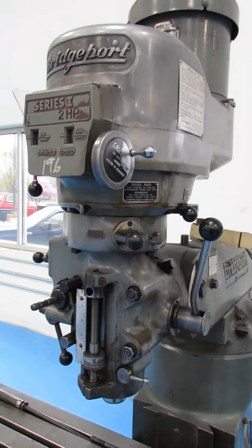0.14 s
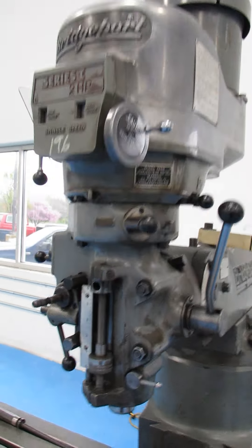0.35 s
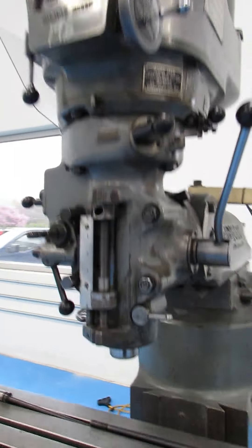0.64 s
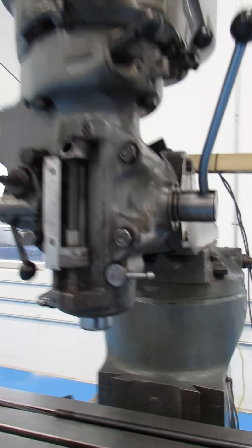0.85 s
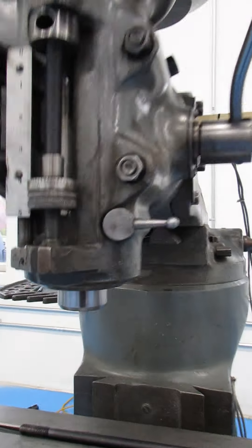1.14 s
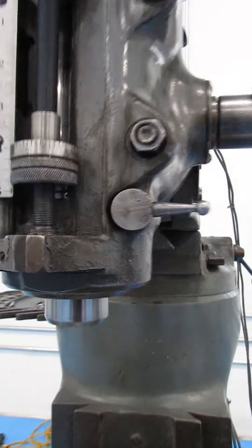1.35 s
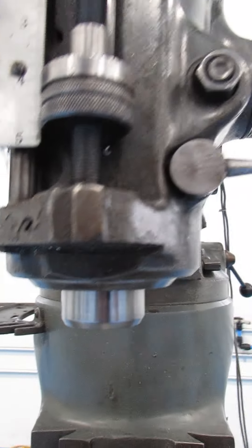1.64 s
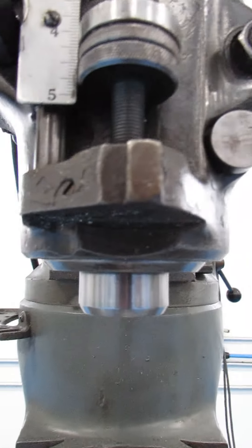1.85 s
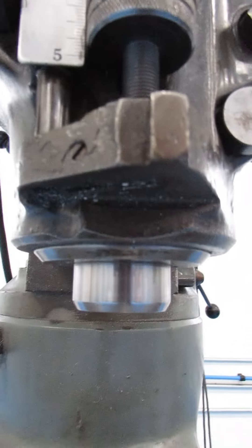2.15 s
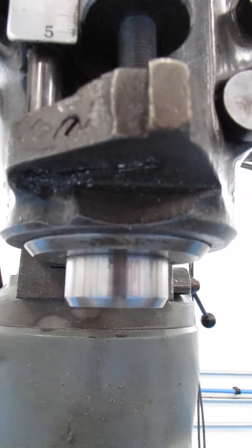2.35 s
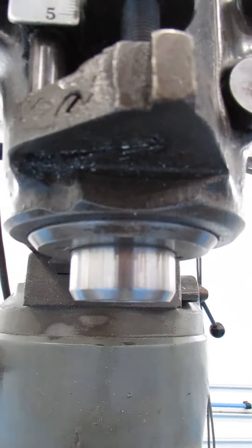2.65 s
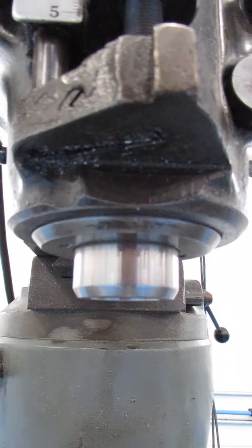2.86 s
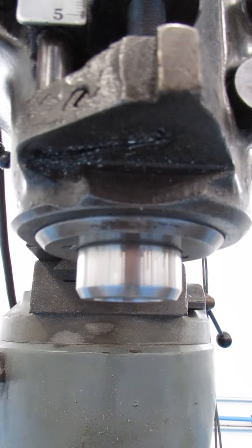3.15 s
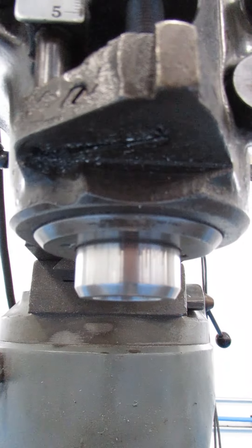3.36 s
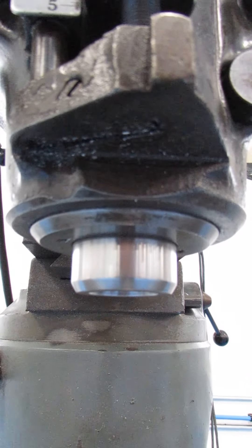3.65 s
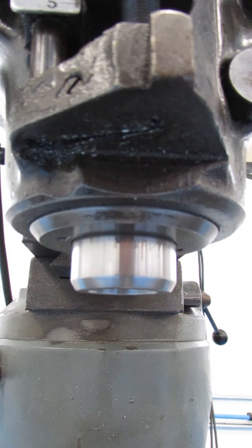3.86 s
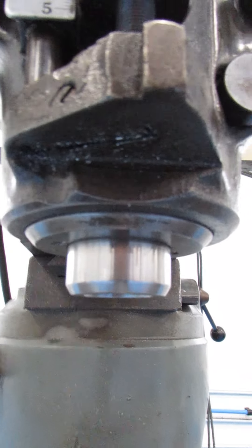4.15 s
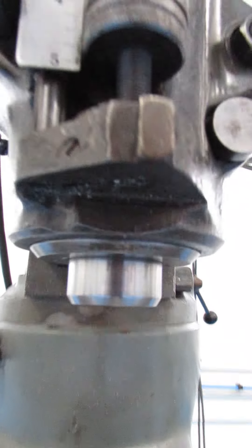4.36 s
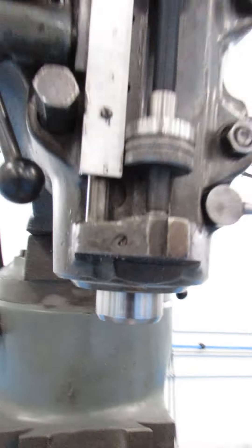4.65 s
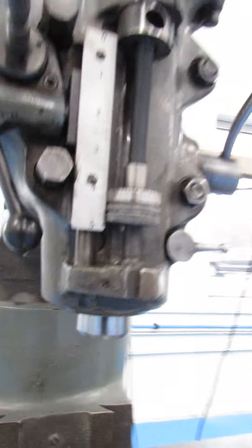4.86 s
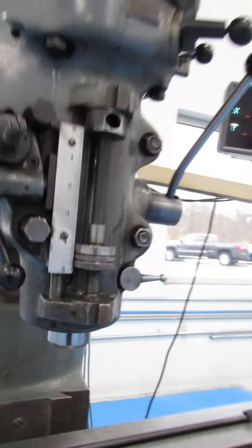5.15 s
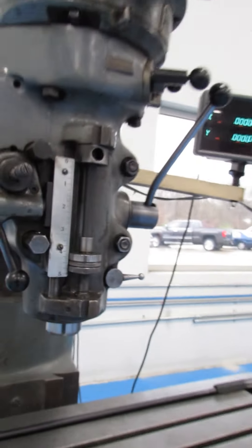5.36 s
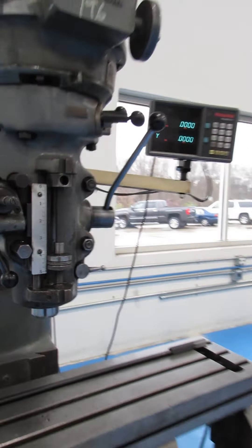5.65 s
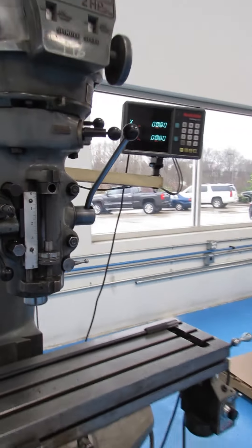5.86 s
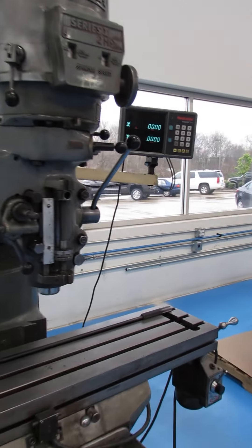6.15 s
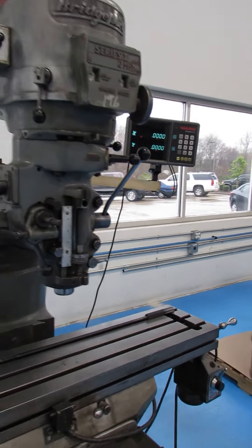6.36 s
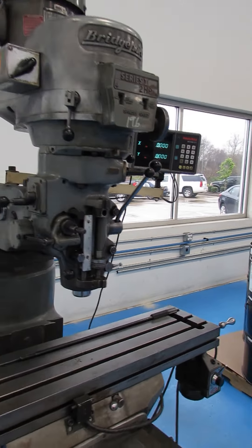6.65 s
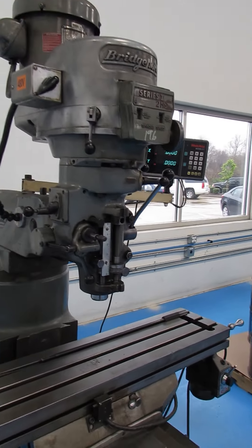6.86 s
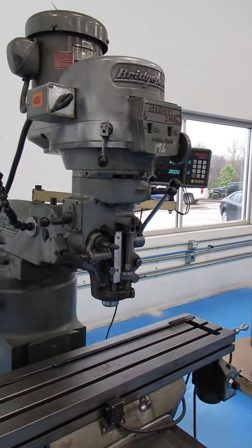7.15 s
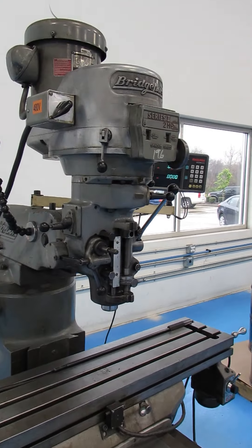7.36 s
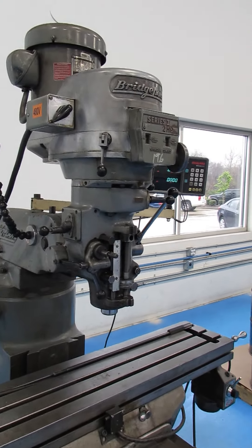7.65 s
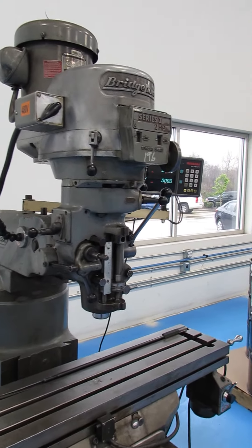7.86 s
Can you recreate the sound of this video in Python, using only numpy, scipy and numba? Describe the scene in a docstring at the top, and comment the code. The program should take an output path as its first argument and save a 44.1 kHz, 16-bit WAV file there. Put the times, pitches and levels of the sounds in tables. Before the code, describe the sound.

A milling machine idles in a workshop, its gears giving a steady, slightly fluttering mid-pitched whine over a low hum, a rushing roar and fast, light metallic knocking. The tone shifts as the hand-held microphone moves closer and away. Fingers scuff and tick on it early on. About halfway, one sharp, loud bump makes the machine sound dip and creep back, and faint high ticking grows clearer toward the end.

```python
"""A milling machine idles in a workshop: its gear mesh whines, a slow rotor thrums as its speed hunts,
and the casting roars and knocks twice a spindle turn while something loose ticks along.
A hand-held camera walks up to the spindle and away again, and the colour shifts with its standpoint.
Fingers scuff and tick on the camera; one hard bump makes its gain control duck and creep back."""
import sys
import numpy as np
from scipy import signal
from scipy.fft import rfft, irfft
from scipy.io import wavfile
from scipy.ndimage import uniform_filter1d
from numba import njit

SR = 44100
rng = np.random.default_rng(int(sys.argv[2]) if len(sys.argv) > 2 else 0)


def wav_record(signal):
    """Record a signal, one row per channel, as 16-bit PCM in the file named by sys.argv[1]."""
    frames = np.transpose(np.atleast_2d(signal))
    bounded = np.clip(frames, -1, 1)
    # unit amplitude maps onto the largest positive 16-bit level
    quanta = np.round(bounded * 32767).astype(np.int16)
    wavfile.write(sys.argv[1], SR, quanta)


N = 353241
T = np.arange(N) / SR
HZ = np.arange(N // 2 + 1) * SR / N
SPINDLE_HZ = 14.452

# the two knocks of each spindle turn: position_turns, width_turns, strength
KNOCK_PATTERN = [(.29, .05, 1.), (.59, .065, 1.)]


def undb(db):
    """Decibels to gain."""
    return 10 ** (np.asarray(db) / 20)


def curves(table, x=T):
    """A table's columns as straight-line envelopes over its first column."""
    first, *columns = np.transpose(table)
    return [np.interp(x, first, column) for column in columns]


def at_place(place, values):
    """Crossfade four values along the camera's standpoints: 0 front, 1 close, 2 backing away, 3 aside."""
    return np.interp(place, range(4), values)


def pan(pan_db):
    """Left and right gains; pan_db is left minus right."""
    return undb(np.array([pan_db, -pan_db]) / 2)


def bell(centre_hz, log_width, steepness=2):
    """A bell curve over log frequency, 1 at its centre."""
    return np.exp(-(np.log(HZ / centre_hz + 1e-9) / log_width) ** steepness)


def wander(rate_hz):
    """Smooth random drift with a spread near 1."""
    hold = int(SR / rate_hz)
    steps = np.repeat(rng.standard_normal(size=320), hold)[:N + hold]
    return 1.3 * uniform_filter1d(uniform_filter1d(steps, hold), hold)[:N]


def add(out, start_s, sound, level_db, pan_db):
    """Level and pan a one-shot, then mix it in."""
    start = int(start_s * SR)
    stereo = undb(level_db) * pan(pan_db)[:, None] * sound
    out[:, start:start + stereo.shape[1]] += stereo[:, :N - start]


def ring(hz, t60_s):
    """A struck mode; the contact lasts about one cycle."""
    t = T[:int(t60_s * SR)]
    return np.sin(2 * np.pi * hz * t) * np.exp(-np.log(1000) * t / t60_s) * np.minimum(hz * t, 1)


@njit
def duck(peak_db, trip_db, target_db, attack, hold_samples, release):
    """Gain control in dB: a peak past the trip level pulls it down; it holds, then creeps back."""
    gain_db = np.empty(len(peak_db))
    now_db, want_db, wait = 0., 0., 0.
    for i in range(len(peak_db)):
        if peak_db[i] > trip_db and target_db - peak_db[i] < min(want_db, now_db):
            want_db, wait = target_db - peak_db[i], hold_samples
        wait -= 1
        if wait > 0:
            now_db += (want_db - now_db) * attack
        else:
            want_db, now_db = 0., now_db * (1 - release)
        gain_db[i] = now_db
    return gain_db


def climbing_hiss():
    """A faint, narrow band of hiss that climbs while the camera backs away."""
    # path of the band: time_s, centre_hz, level_db
    sweep = [(4.2, 5500, -56), (4.6, 5600, -53), (4.9, 6400, -52), (5.2, 7200, -56), (5.45, 8800, -60),
             (5.75, 9700, -54), (6.3, 9500, -52), (6.7, 10700, -57), (7.1, 10600, -75)]
    centre_hz, level_db = curves(sweep)
    noise = signal.lfilter(*signal.butter(2, 650, fs=SR), rng.standard_normal((4, N)))
    noise /= noise.std()
    phase = 2 * np.pi * np.cumsum(centre_hz) / SR
    mid, side = noise[:2] * np.cos(phase) + noise[2:] * np.sin(phase)
    return undb(level_db) * (mid + .4 * side * np.array([[1], [-1]]))


def nail_ticks():
    """Fingernails tap the camera: a short crack, dull above the shell's brief ring."""
    # taps: start_s, level_db, pitch_hz, pan_db
    taps = [(1.108, -22, 9000, 9), (1.1225, -22, 4500, 9), (1.135, -18, 5000, 9), (1.147, -21, 3000, 9),
            (1.2825, -21, 4500, 6), (1.284, -24, 6200, 6), (1.469, -24, 5500, 5), (1.4705, -22, 6600, 5),
            (1.472, -18, 3800, 5), (1.5505, -13.5, 4000, 8), (1.551, -18, 6800, 9), (1.552, -15, 3000, 7),
            (1.554, -12, 2000, 6), (2.167, -35, 10000, -6), (4.095, -15, 4500, 10), (4.0953, -26, 7500, 10),
            (4.113, -20, 4000, 8), (4.1054, -13, 2400, 10), (4.1045, -29, 6800, 10), (4.182, -19, 6800, 6),
            (5.3, -32, 11000, 6), (5.301, -28, 7000, 3)]
    out = np.zeros((2, N))
    for start_s, level_db, hz, pan_db in taps:
        burst = rng.standard_normal(size=220) * np.exp(-T[:220] / .0008)
        crack = signal.lfilter(*signal.butter(4, 1.2 * hz, fs=SR), burst)
        add(out, start_s, .7 * crack, level_db, pan_db)
        add(out, start_s, .7 * ring(hz, t60_s=.004), level_db, pan_db)
    return out


def finger_scuffs():
    """Skin rubs the camera near the left microphone port in short, gritty swells."""
    # rubs: start_s, loudest_s, end_s, level_db, pan_db, cutoff_hz
    rubs = [(1.08, 1.135, 1.154, -25, 11, 10500), (1.09, 1.14, 1.154, -28, 9, 5000),
            (4.095, 4.131, 4.14, -23, 8, 4000), (4.118, 4.133, 4.141, -20.5, 12, 8000),
            (4.134, 4.145, 4.165, -17, 8, 5500), (4.15, 4.175, 4.195, -34, 14, 13000)]
    out = np.zeros((2, N))
    grains = rng.standard_normal((2, N)) * undb(1.4 * rng.exponential(size=N))
    for start_s, loudest_s, end_s, level_db, pan_db, cutoff_hz in rubs:
        grit = signal.lfilter(*signal.butter(2, [cutoff_hz / 4, cutoff_hz], "band", fs=SR), grains)
        swell = np.interp(T, [start_s, loudest_s, end_s], [0, 1, 0]) ** 1.5
        out += grit / grit.std() * undb(level_db) * pan(pan_db)[:, None] * swell
    return out


def shell_bump():
    """One hard bump, three contacts in quick succession, rings the camera's shell."""
    # shell modes: pitch_hz, level_db, t60_s
    modes = [(350, -2.2, .025), (732, -4, .02), (1000, -5, .015), (1600, -6, .01), (2250, -9, .012),
             (3600, -13, .008), (7111, -16, .005)]
    # contacts: start_s, level_db, pan_db, cutoff_hz
    contacts = [(4.1326, 6, 3, 5000), (4.1368, 7, 3, 800), (4.1462, 7, 6, 1300)]
    blow = np.zeros(SR // 10)
    for hz, level_db, t60_s in modes:
        mode = undb(level_db) * ring(hz, t60_s)
        blow[:len(mode)] += mode
    # the shell rocks: one port is pushed while the other is pulled, a moment apart
    rocking = np.array([blow, -np.roll(blow, shift=5)])
    out = np.zeros((2, N))
    for start_s, level_db, pan_db, cutoff_hz in contacts:
        thud = signal.lfilter(*signal.butter(2, cutoff_hz, fs=SR), rocking)
        add(out, start_s, thud / abs(thud).max(), level_db, pan_db)
    return out


def steady_tones(place):
    """Faint steady hums from mains and machine, and the camera's thin high whine; their levels waver."""
    # tones: pitch_hz, front_db, close_db, backing_db, aside_db
    tones = [(60.3, -43, -39.5, -43, -37), (72.6, -44, -42, -46, -44), (120, -42, -41, -44, -43),
             (159.8, -48, -48, -44, -36), (173.4, -45, -41, -50, -50), (195.8, -45, -40, -52, -46),
             (240, -48, -35, -50, -46), (260.2, -45, -42, -44, -31), (289, -42, -38, -47, -47),
             (298.6, -42, -39, -48, -48), (390.1, -33, -33, -41, -43), (15734, -76, -71, -76, -71)]
    out = np.zeros(N)
    for hz, *levels_db in tones:
        level_db = at_place(place, levels_db) + 1.6 * wander(3)
        out += np.sqrt(2) * undb(level_db) * np.sin(2 * np.pi * (hz * T + rng.random()))
    return out


def spindle_ticks(place):
    """Something loose clicks faintly once a turn, most from the side, with clearer accents on top."""
    # clearer clicks: start_s, level_db, pitch_hz, pan_db
    accents = [(0.2982, -37, 8930, -1.5), (0.5591, -38, 8830, -1.5), (0.9906, -30, 9380, .6),
               (1.4052, -40, 9100, -8), (1.5444, -38, 9200, -3.5), (2.389, -37, 3900, -.6),
               (2.7138, -38, 3700, -2.5), (2.9811, -40, 9000, -3.5), (3.499, -32, 3900, -1.5),
               (3.6572, -35, 3700, -.6), (3.7524, -36, 4100, -1.1), (4.371, -42, 8950, 0),
               (4.4444, -45, 8300, -2.5), (5.2644, -36, 9100, -2.2), (5.4186, -35, 8910, 1.1),
               (5.6266, -33, 9900, 3), (5.8341, -28, 9900, 3), (5.9035, -36, 10300, 1.5),
               (6.0412, -37, 9700, .6), (6.1124, -37, 10000, -.6), (6.2362, -31, 8200, -2.2),
               (6.2524, -33, 10800, -.6), (6.5266, -21, 9400, .6), (6.6653, -29, 8800, -1.5),
               (6.8039, -28, 9250, -1.1), (7.2883, -25, 9980, -.6), (7.4954, -29, 8720, -2.5)]
    starts_s = (np.arange(int(T[-1] * SPINDLE_HZ)) + .36) / SPINDLE_HZ
    force, detune = rng.standard_normal((len(starts_s), 2)).T
    faint_db = at_place(place[(starts_s * SR).astype(int)], [-45, -50, -42, -39]) + 3 * force
    faint_hz = 9500 * (1 + .07 * detune)
    faint = [(start_s, db, hz, -1.5) for start_s, db, hz in zip(starts_s, faint_db, faint_hz)]
    out = np.zeros((2, N))
    for start_s, level_db, hz, pan_db in faint + accents:
        cluster_hz = hz * np.array([.95, .985, 1.015, 1.06]) * (1 + .015 * rng.standard_normal(4))
        click = sum(ring(mode_hz, t60_s=.012) for mode_hz in cluster_hz) / 1.2
        click *= np.minimum(T[:len(click)] / .0005, 1)  # the loose part lands softly
        add(out, start_s, click, level_db, pan_db)
    return out


def rattle_spectra(place):
    """Two spectra of bearing and belt noise, each part restless rush and part pulsing with the knocks."""
    # share of the rattle that comes in knocks: front, close, backing, aside
    knock_shares = [.5, .55, .4, .2]
    turn = T * SPINDLE_HZ
    force = undb(1.2 * rng.standard_normal((int(turn[-1]) + 1, len(KNOCK_PATTERN))))[turn.astype(int)]
    pulses = sum(strength * force[:, k] * np.exp(-.5 * ((turn % 1 - position) / width) ** 2)
                 for k, (position, width, strength) in enumerate(KNOCK_PATTERN))
    depth = at_place(place, knock_shares)
    gate = np.sqrt(1 - depth + depth * pulses ** 2 / np.mean(pulses ** 2))
    # the knocks shake mostly the modes around 1 kHz
    share = .33 * bell(1050, .4) + .15 * (HZ > 600) * (HZ < 5000)
    spectra = []
    for _ in range(2):
        rattle = rfft(gate * rng.standard_normal(N))
        rush = rfft(undb(1.2 * wander(9)) * rng.standard_normal(N))
        spectra.append(np.sqrt(share) * rattle + np.sqrt(1 - share) * rush)
    return spectra


def casting_roar(place):
    """Bearing and belt noise resonates in the casting, with its own colour at each standpoint."""
    # base tone of the roar at each standpoint: frequency_hz, density_db, pan_db, coherence (0-1)
    front = [(35, -62.4, -0.1, 1.0), (110, -51.0, 0.4, 0.995), (280, -49.3, -0.4, 0.96),
             (480, -51.6, -4.2, 0.97), (640, -50.8, -5.0, 0.97), (950, -58.6, -2.9, 0.94),
             (1400, -59.0, -2.2, 0.97), (1800, -68.5, -1.8, 0.93), (3000, -68.6, -2.2, 0.98),
             (5000, -80.4, -0.8, 0.92), (7000, -83.4, -0.9, 0.83), (10000, -89.5, -0.6, 0.62),
             (12500, -96.2, 0.2, 0.43), (15000, -100.7, -0.1, 0.38)]
    close = [(35, -64.1, 0.1, 1.0), (110, -51.2, 0.3, 0.995), (280, -49.1, -0.9, 0.95),
             (480, -54.8, -1.7, 0.74), (640, -54.3, -5.4, 0.89), (950, -51.7, -4.5, 0.94),
             (1400, -61.0, -1.8, 0.74), (1800, -67.3, -2.2, 0.75), (3000, -73.8, -1.6, 0.62),
             (5000, -81.7, -1.9, 0.54), (7000, -88.0, -5.3, 0.57), (10000, -92.5, -11.4, 0.49),
             (12500, -100.4, -12.9, 0.25), (15000, -105.1, -8.0, 0.22)]
    backing = [(35, -70.1, -0.0, 1.0), (110, -58.1, 0.3, 0.99), (280, -52.2, -0.8, 0.95),
               (480, -56.1, -4.5, 0.97), (640, -56.5, -4.9, 0.98), (950, -60.3, -3.5, 0.98),
               (1400, -59.4, -2.0, 0.99), (1800, -65.9, -1.2, 0.98), (3000, -73.7, 0.6, 0.98),
               (5000, -88.2, -1.4, 0.6), (7000, -87.5, -3.9, 0.67), (10000, -87.7, 4.0, 0.77),
               (12500, -97.4, 2.2, 0.37), (15000, -100.3, -3.4, 0.49)]
    aside = [(35, -63.0, 0.0, 1.0), (110, -52.0, 0.0, 0.995), (280, -51.5, -1.0, 0.96),
             (480, -52.0, -4.2, 0.98), (640, -56.5, -4.4, 0.98), (950, -57.3, -2.7, 0.98),
             (1400, -57.5, -1.6, 0.99), (1800, -61.6, -1.1, 0.98), (3000, -67.2, 0.2, 1.0),
             (5000, -78.9, -0.1, 0.87), (7000, -80.3, -5.2, 0.89), (10000, -84.4, 0.0, 0.92),
             (12500, -93.7, -0.4, 0.47), (15000, -95.7, -3.5, 0.37)]
    # the casting's peaks and hollows: centre_hz, width_hz, front_db, close_db, backing_db, aside_db
    resonances = [(103, 35, -4, -5, -4, -6), (1550, 50, 0, -1, 0, 5), (1490, 80, -1, -4, 0, 0),
                  (3060, 110, 0, 3, 0, 0), (3400, 200, 0, 3, 0, 0), (4560, 70, 2, 4, 0, 1),
                  (250, 30, 2, 4, 2, 4), (330, 40, -4, -4, -4, -1), (445, 30, 5, 3, 2, 4),
                  (490, 30, -3, -3, -3, -3), (635, 45, 0, 5, 7, 7), (685, 40, -1, -5, -4, -5),
                  (890, 50, 4, 0, 0, 3), (960, 300, -1, -2, -2, -1), (1140, 60, 0, 0, 4, -3),
                  (1290, 110, 0, 0, 0, 1.5), (1400, 90, 3, 2, 2, 0), (1710, 100, -4, -3, -2, -2),
                  (1850, 60, 0, 4, 0, 0), (2110, 80, 5, 0, 3, 2), (2500, 160, -1, 3, -2, -3),
                  (2985, 110, 3, 0, 2, 3.5), (3870, 90, 0, 0, 3, 3), (4130, 120, 3, 4, 0, 0),
                  (6500, 180, 4, 4, 0, 4), (5900, 600, 0, 0, -2, -2), (7150, 200, 0, 1, 2, 4),
                  (7750, 250, 0, 1, 7, 1), (8300, 400, -3, 0, -3, -2), (9400, 400, 4, 2, 0, 5),
                  (10300, 600, 0, 1, 0, 1), (12500, 3000, -2, -1, -2, -1)]
    # lag of the left port behind the right: front_s, close_s, backing_s, aside_s
    lags_s = [0, 6e-5, 1e-5, 0]
    mid_noise, side_noise = rattle_spectra(place)
    out = np.zeros((2, N))
    for k, colour in enumerate((front, close, backing, aside)):
        level_db, pan_db, coherence = curves([(np.log(hz), *row) for hz, *row in colour], np.log(HZ + 1))
        level_db += sum(gains_db[k] / (1 + (2 * (HZ - hz) / width_hz) ** 2)
                        for hz, width_hz, *gains_db in resonances)
        level_db -= 10 * np.log10(1 + (38 / (HZ + 1)) ** 8)  # low cut under the lowest hum
        coherence **= np.clip(HZ / 300, .5, 1)  # the bass is nearly mono
        mid = mid_noise * np.sqrt((1 + coherence) / 2)
        side = side_noise * np.sqrt((1 - coherence) / 2)
        ports = np.array([(mid + side) * np.exp(-2j * np.pi * HZ * lags_s[k]), mid - side])
        crossfade = np.clip(1 - abs(place - k), 0, 1)
        out += crossfade * irfft(ports * pan(pan_db) * undb(level_db), N)
    return out * np.sqrt(SR / 2)


def sliding_notch(roar, half_width_hz=350):
    """A shallow notch slides up through the roar as the camera starts to back away."""
    # path of the notch: time_s, centre_hz, depth (0-1)
    sweep = [(4.3, 3600, 0), (4.55, 3650, .4), (4.85, 3500, .45), (5.1, 3900, .4), (5.4, 4500, 0)]
    centre_hz, depth = curves(sweep)
    carrier = np.exp(2j * np.pi * np.cumsum(centre_hz) / SR)
    baseband = signal.filtfilt(*signal.butter(2, half_width_hz, fs=SR), roar / carrier)
    return roar - depth * 2 * np.real(baseband * carrier)


def spindle_knocks(place, attack_s=.004, pan_db=-3.):
    """Knocks ring the casting, each with its own timing and blend of modes; some turns run harder."""
    # struck modes: pitch_hz, t60_s, front_db, close_db, backing_db, aside_db
    modes = [(765, .06, -31, -24, -36, -31), (895, .07, -26, -28, -38, -28),
             (940, .08, -32, -21.5, -40, -30), (1000, .06, -34, -25, -40, -32),
             (1140, .06, -31, -26, -29, -32), (1290, .08, -32, -34, -29, -21),
             (1390, .07, -31, -28, -35, -31), (1845, .08, -40, -35, -42, -36),
             (2120, .07, -34, -42, -38, -35), (2540, .06, -38, -40, -46, -42),
             (2985, .08, -37, -45, -42, -35), (4100, .05, -44, -46, -50, -46)]
    out = np.zeros((2, N))
    turns = int(T[-1] * SPINDLE_HZ)
    turn_db = 1.7 * rng.standard_normal(turns)
    for position, width, strength in KNOCK_PATTERN:
        for turn in range(turns):
            late, force, detune, *blend = rng.standard_normal(3 + len(modes))
            start_s = (turn + position + width * (.7 * late - 1.1)) / SPINDLE_HZ
            accent_db = turn_db[turn] + 1.2 * force
            for (hz, t60_s, *levels_db), emphasis in zip(modes, blend):
                level_db = at_place(place[int(start_s * SR)], levels_db) + accent_db + 2.2 * emphasis
                mode = ring(hz * (1 + .012 * detune), t60_s)
                mode *= np.minimum(T[:len(mode)] / attack_s, 1)
                add(out, start_s, strength * mode, level_db, pan_db + 2.5 * emphasis * detune)
    return out


def rotor_thrum(place, mean_hz=22.25):
    """Harmonics of a rotor whose speed hunts up and down; some swell as they near a resonance."""
    # the hunting rotor and two of its harmonics: time_s, speed_hz, third_db, sixth_db
    hunting = [(0, 22.47, -30, -34), (.45, 22.55, -26, -28), (.8, 22.6, -28, -24.5), (1.15, 22.4, -29, -25),
               (1.4, 22.3, -33, -40), (1.65, 21.95, -28, -40), (1.9, 21.9, -24, -28),
               (2.25, 22.0, -26, -32), (2.6, 22.2, -28, -44), (3.1, 22.52, -32.5, -29),
               (3.35, 22.3, -32, -34), (3.6, 22.07, -27, -42), (4.0, 21.97, -25, -32),
               (4.6, 22.55, -32, -29), (5.1, 22.42, -32, -28), (5.7, 22.53, -31, -29),
               (6.05, 22.13, -29.5, -34), (6.5, 22.05, -26.5, -42), (6.9, 22.03, -23.5, -32),
               (7.6, 22.12, -23.5, -31), (8.01, 22.37, -26.5, -34)]
    # the rest: harmonic, swell_db_per_hz (above mean speed), front_db, close_db, backing_db, aside_db
    others = [(2, 0, -44, -44, -44, -44), (4, 6, -37, -36, -37, -41), (5, 0, -44, -41, -44, -41),
              (7, 6, -35, -28, -36, -46), (8, 0, -43, -43, -43, -43), (9, 0, -44, -34, -50, -41),
              (11, 0, -39, -36, -40, -39), (12, 10, -32, -40, -33, -26)]
    speed_hz, third_db, sixth_db = curves(hunting)
    angle = 2 * np.pi * np.cumsum(speed_hz) / SR
    harmonics = [(3, third_db), (6, sixth_db)]
    for harmonic, swell, *levels_db in others:
        harmonics.append((harmonic, swell * (speed_hz - mean_hz) + at_place(place, levels_db)))
    out = np.zeros(N)
    for harmonic, level_db in harmonics:
        gain = np.sqrt(2) * undb(level_db + 1.2 * wander(9))
        out += gain * np.sin(harmonic * angle + 2 * np.pi * rng.random())
    return out


def gear_whine(pitch_hz=553.3):
    """Meshing teeth sing one tone, shaken in phase and level by the runout of their shafts."""
    # the camera's path through the whine's standing waves: time_s, level_db, pan_db, left_lead_rad
    standing_waves = [(0, -20.6, -9.2, -.2), (.35, -20.4, -9.2, -.32), (.7, -22.5, -6.7, -.93),
                      (1.0, -16.4, -2, -.72), (1.7, -16.6, -3.3, -.9), (2.7, -19.2, -2.7, -.95),
                      (4.05, -19, -2.8, -.93), (4.5, -19, -4.8, -.58), (5.2, -17, -3.2, -.25),
                      (6.0, -19.5, -2.4, -.27), (6.35, -16.6, -3, -.17), (7.3, -19.4, -3, -.14),
                      (8.01, -18.7, -2.4, -.1)]
    # shaft wobbles: rate_hz, phase_swing_rad, tremolo_depth, tremolo_lead_rad
    runout = [(8.53, .2, .12, 1.), (17.06, .33, .15, 4.), (25.6, .13, .04, 0), (14.45, .18, .04, 0)]
    level_db, pan_db, left_lead = curves(standing_waves)
    flutter = 1 + .16j * wander(35) + .13 * wander(35)  # imaginary shakes the phase, real the level
    for rate_hz, swing, tremolo, lead in runout:
        angle = 2 * np.pi * (rate_hz * T + rng.random())
        flutter += 1j * swing * np.cos(angle) + tremolo * np.cos(angle + lead)
    tone = flutter * np.exp(2j * np.pi * pitch_hz * T)
    return np.sqrt(2) * undb(level_db) * pan(pan_db) * np.real([tone * np.exp(1j * left_lead), tone])


def scene():
    """The machine along the camera's walk, plus hiss and handling noise, at the two microphone ports."""
    # the walk: time_s, standpoint (0-3), roar_gain_db, rasp_lift_db
    route = [(0, 0, .7, 0), (.6, 0, 1.5, 0), (1.1, .3, 1.7, 1), (1.6, 1, 1, -1), (2.2, 1, 1.2, .6),
             (3.2, 1, .6, 0), (4.05, 1, 1.2, 1.5), (4.4, 1.1, .8, 3), (4.8, 1.25, .6, 2.5),
             (5.2, 1.4, 1.2, 2.5), (5.35, 1.8, 2.2, 3), (5.6, 2, 2.2, .8), (6.1, 2.15, 1.8, .3),
             (6.6, 2.6, 2.2, -.4), (7, 3, 1.8, 0), (8.01, 3, 1.5, -.5)]
    place, roar_db, lift_db = curves(route)
    roar = casting_roar(place)
    rasp = irfft(rfft(roar) * bell(4000, .9, steepness=4), N)
    roar = sliding_notch(undb(roar_db) * (roar + (undb(lift_db) - 1) * rasp))
    drone = roar + gear_whine() + steady_tones(place) + rotor_thrum(place)
    machine = drone + spindle_ticks(place) + spindle_knocks(place)
    return machine + climbing_hiss() + nail_ticks() + finger_scuffs() + shell_bump()


def record(dry):
    """The camera's chain: port phase shift, stereo-linked gain control, hard clip and a steep top cut."""
    # the ports answer with a different phase around a cavity resonance
    twist = np.exp(-.7j * bell(330, .4))
    ports = np.array([irfft(rfft(dry[0]) * twist, N), dry[1]])
    peak_db = 20 * np.log10(abs(ports).max(axis=0) + 1e-9)
    gain_db = duck(peak_db, trip_db=3.5, target_db=-7.6,
                   attack=1 / (.009 * SR), hold_samples=.07 * SR, release=1 / (.71 * SR))
    clipped = np.clip(ports * undb(gain_db), -.93, .93)
    return signal.sosfilt(signal.ellip(14, .2, 80, 15760, fs=SR, output="sos"), clipped)


dry = scene()
out = record(dry)
wav_record(out)
```